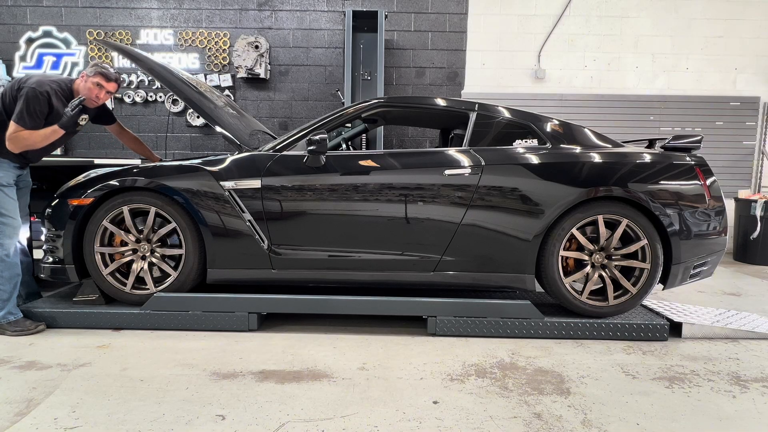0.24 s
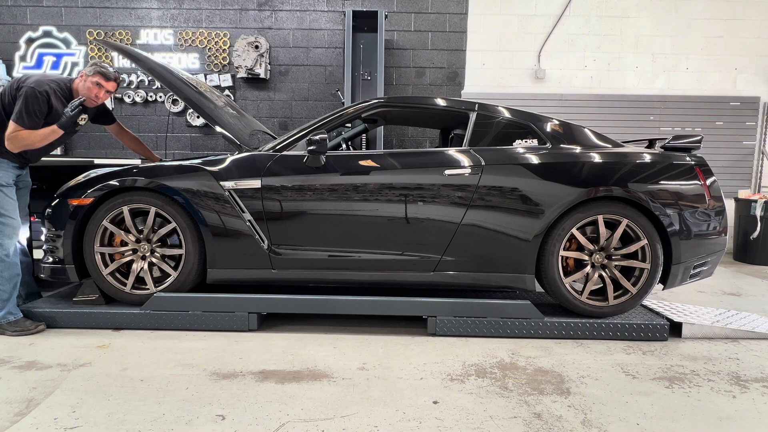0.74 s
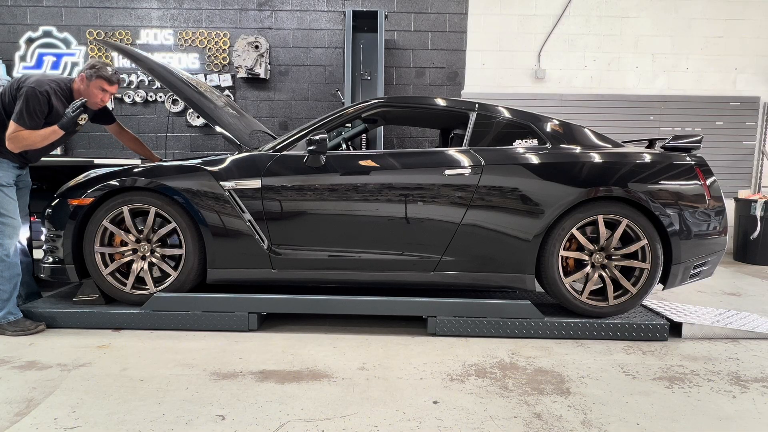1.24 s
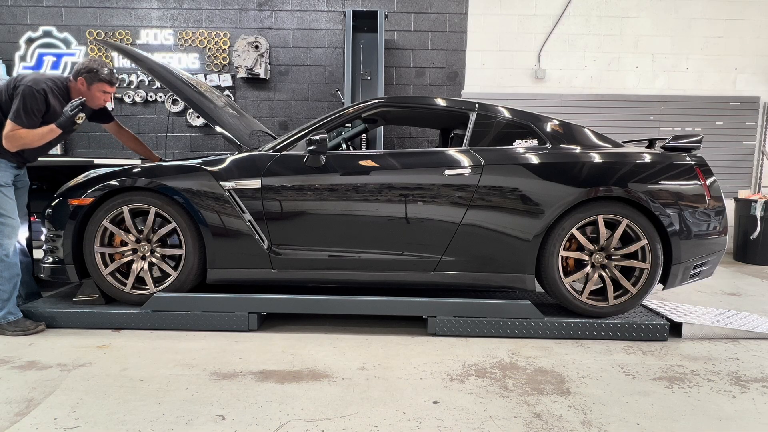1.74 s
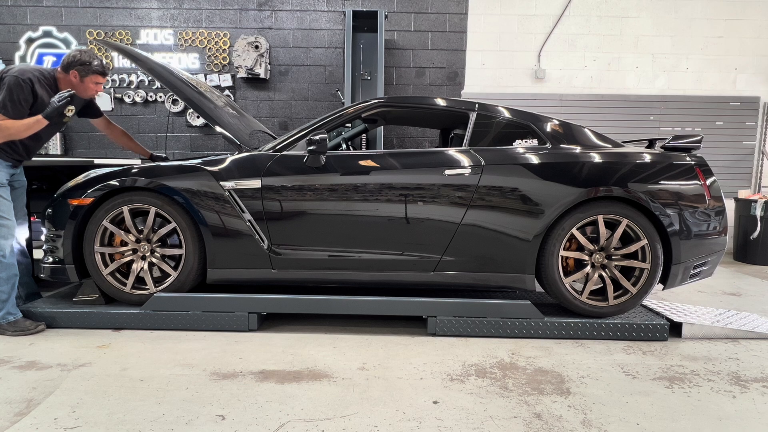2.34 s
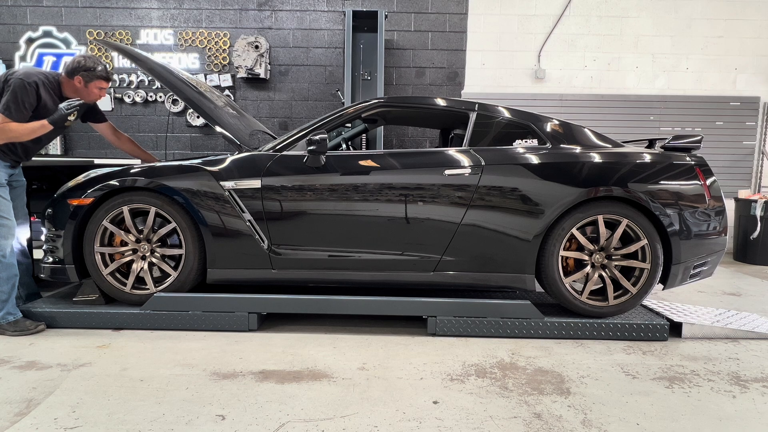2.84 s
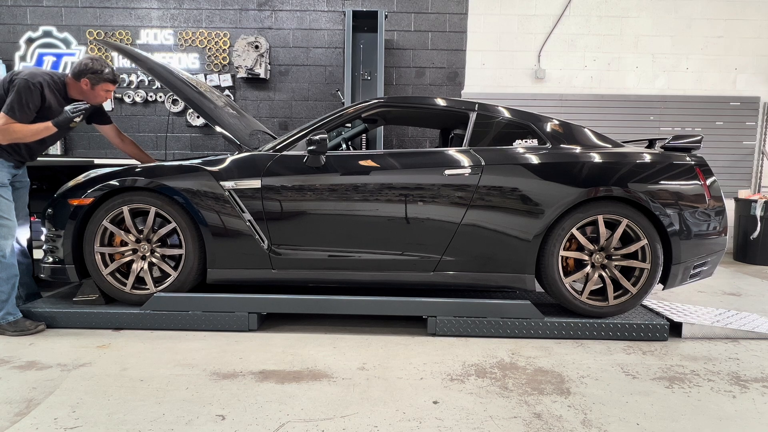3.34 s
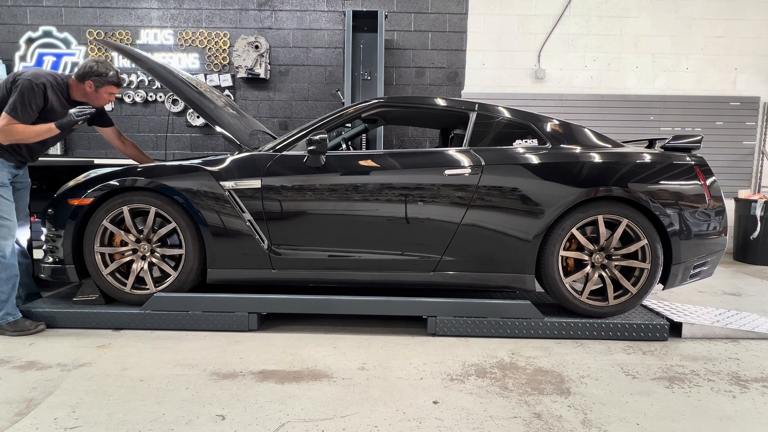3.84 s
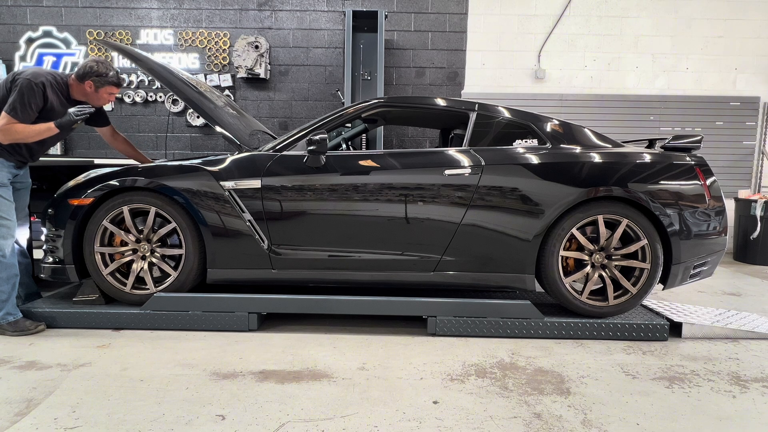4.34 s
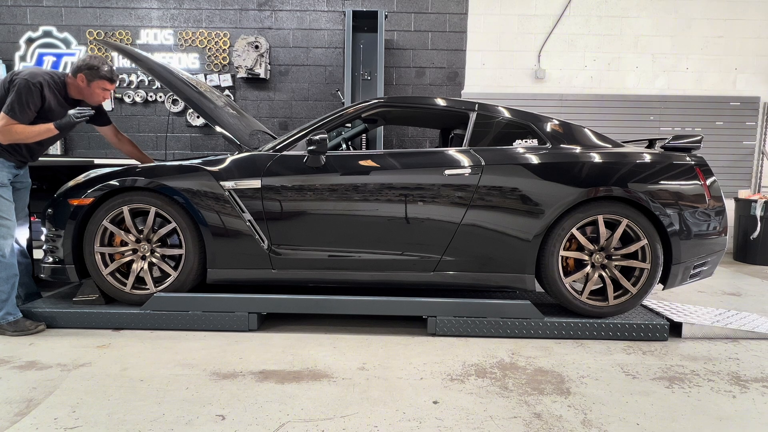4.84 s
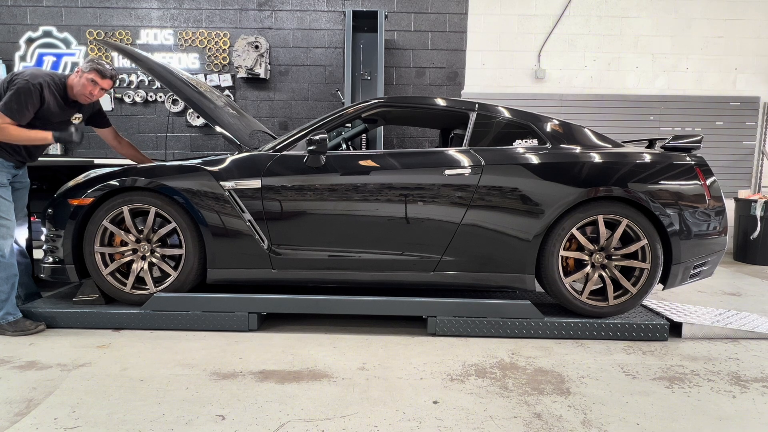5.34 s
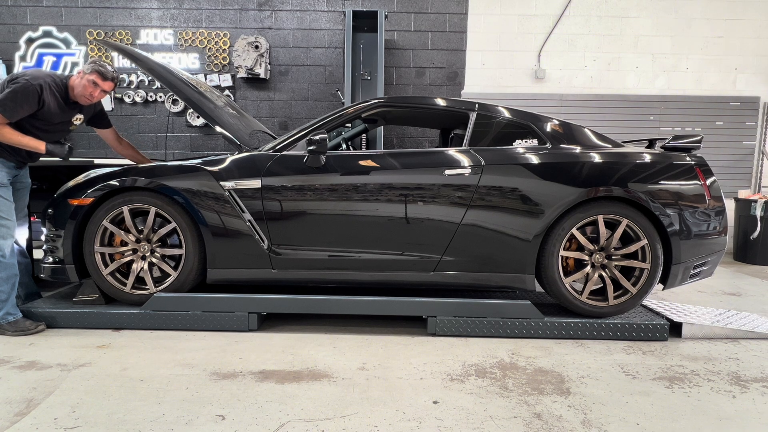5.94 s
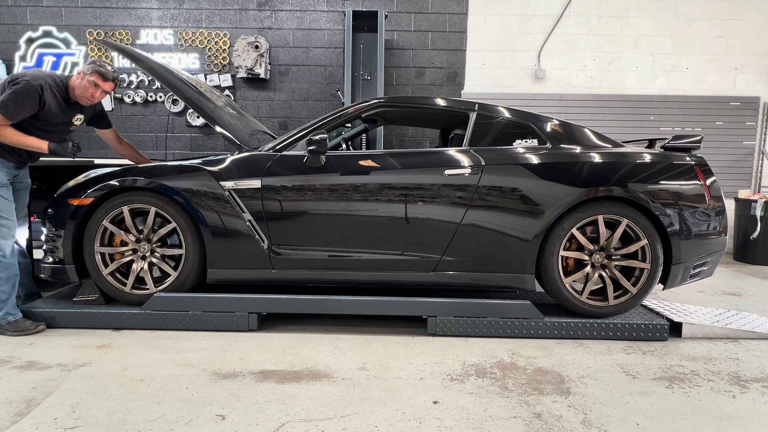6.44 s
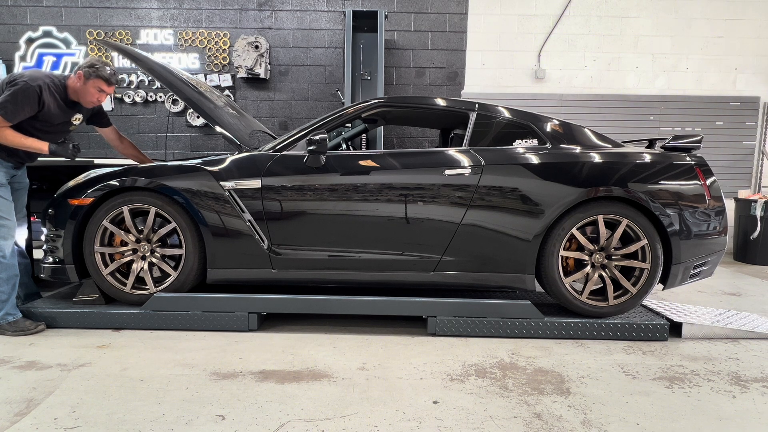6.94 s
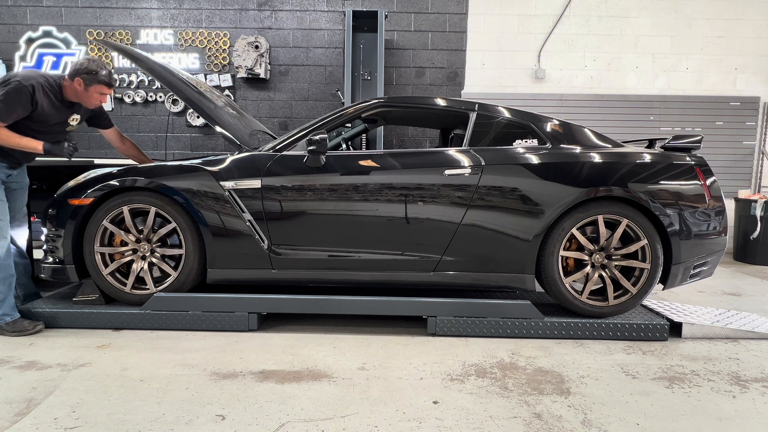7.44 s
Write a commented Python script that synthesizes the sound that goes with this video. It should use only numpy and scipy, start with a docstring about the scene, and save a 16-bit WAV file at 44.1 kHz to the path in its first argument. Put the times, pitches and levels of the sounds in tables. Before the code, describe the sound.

Lumpy car idle with rhythmic chuffing exhaust pops for four seconds, then the engine catches and settles into a steady low hum with faint belt squeaks.

```python
"""In a workshop, a six-cylinder turbo engine idles with its bonnet open to the left.
For about four seconds it misfires: once a cycle the exhaust thumps, chuffs and clatters. Then the cylinder
catches, the speed flares a little and settles to an even burble. Pulses through pipe resonances make the
stumble, sines the burble and whines, shaped noise the engine-bay rush and chuffs, struck resonances the
clatter, clicks the valve ticking and hoarse tones the belt squeak."""
import sys
import numpy as np
from scipy import signal
from scipy.fft import rfft, irfft, next_fast_len
from scipy.io import wavfile
from scipy.ndimage import uniform_filter1d

SR = 44100
rng = np.random.default_rng(int(sys.argv[2]) if len(sys.argv) > 2 else 0)


def transcribe(signal):
    """Save signal, clipped to [-1, 1], as a 16-bit WAV file at the path in sys.argv[1]."""
    frames = np.atleast_2d(signal).T
    limited = np.clip(frames, -1, 1)
    pcm = np.round(limited * 32767).astype(np.int16)
    wavfile.write(sys.argv[1], SR, pcm)


N = 338247
TIME = np.arange(N) / SR
SIZE = next_fast_len(N + SR // 2)   # transform length, with room for echoes to die away
HZ = np.maximum(np.arange(SIZE // 2 + 1) * SR / SIZE, 1)


def from_db(db):
    """Turn decibels into a gain."""
    return 10 ** (np.asarray(db) / 20)


def rms_one(x):
    """Scale to an average strength (rms) of 1."""
    return x / np.sqrt(np.mean(x ** 2) + 1e-20)


def in_time(rows, column=1):
    """Join the points of a table by straight lines over time."""
    rows = np.array(rows)
    return np.interp(TIME, rows[:, 0], rows[:, column])


def over_hz(rows, column=1):
    """Join the points of a table into a spectrum, on a log-frequency axis."""
    rows = np.array(rows)
    return np.interp(np.log(HZ), np.log(rows[:, 0]), rows[:, column])


def filtered(x, response):
    """Apply a frequency response."""
    return irfft(rfft(x, SIZE) * response, SIZE)[..., :N]


def drift(rate_hz):
    """Slow random wandering with rms 1; it weakens above rate_hz."""
    knots = np.arange(0, N + SR, 100)
    spectrum = rfft(rng.standard_normal(len(knots)))
    hz = np.arange(len(spectrum)) * SR / knots[-1]
    slow = irfft(spectrum / (1 + (hz / rate_hz) ** 2), len(knots))
    return rms_one(np.interp(TIME, knots / SR, slow))


def clicks(times, sizes):
    """Single-sample impulses."""
    places = np.clip(np.round(times * SR).astype(int), 0, N - 1)
    return np.bincount(places, sizes, N)


def resonance(hz, width):
    """Response of one resonance, 1 at its peak."""
    return 1j * HZ * width / (hz ** 2 - HZ ** 2 + 1j * HZ * width)


def boosts(rows):
    """Resonant peaks and dips, one after another."""
    return np.prod([1 + (from_db(db) - 1) * resonance(hz, width) for hz, width, db in rows], axis=0)


def butter(edge_hz, kind, order):
    """Response of a high- or low-pass that only looks back in time."""
    return signal.freqs(*signal.butter(order, edge_hz, kind, analog=True), HZ)[1]


# how the sound spreads over the two sides:
# (frequency [Hz], left minus right level [dB], left-right likeness [-1 to 1])
STEREO = [(45, 8, 1), (80, 10, .98), (150, 13, .95), (280, 13, .9), (480, 8.5, -.75), (700, 7.5, -.6),
          (1100, 7.5, .1), (2400, 8, 0), (3500, 13, 0), (5300, 17, 0), (6500, 12, 0), (8000, 0, -.3),
          (12000, 0, .4)]


def diffuse(pair):
    """Mix two unrelated signals into left and right with the likeness of the room."""
    alike = np.clip(over_hz(STEREO, column=2), -1, 1)
    shared = filtered(pair[0], np.sqrt(1 + alike))
    opposed = filtered(pair[1], np.sqrt(1 - alike)) * [[1], [-1]]
    return shared + opposed


def workshop(x, t60, wet_db):
    """Direct sound plus a dense tail off the block walls, falling 60 dB in t60 seconds."""
    tail = rng.standard_normal((2, SR)) * from_db(-60 * TIME[:SR] / t60)
    tail *= from_db(wet_db) / np.sqrt(np.sum(tail ** 2) / 2)
    return x + diffuse(filtered(x, rfft(tail, SIZE)))


# speed of the crankshaft: (time [s], speed [revolutions per minute])
SPEED = [(0.0, 903.4), (0.6, 890.2), (1.1, 888.0), (1.7, 904.4), (2.2, 896.3), (2.7, 893.9), (3.2, 900.3),
         (3.8, 897.5), (4.0, 935.0), (4.2, 983.9), (4.45, 1003.0), (4.75, 978.1), (5.3, 943.9),
         (5.7, 948.7), (6.05, 956), (6.4, 972.5), (6.9, 950.1), (7.67, 944.5)]


def crankshaft_rpm():
    """The crankshaft's speed over time: it flares as the cylinder catches, then settles."""
    return in_time(SPEED)


def passings(cycle, count):
    """Times and numbers of things that happen count times in an engine cycle."""
    number = np.arange(np.ceil(cycle[0] * count), cycle[-1] * count)
    return np.interp(number / count, cycle, TIME), number.astype(int) % count


# engine-bay rush, before the panels colour it: (frequency [Hz], level [dB per Hz])
RUSH = [(15, -35), (28, -20), (45, -17), (72, -13.5), (120, -20.5), (220, -23), (280, -22), (320, -23.5),
        (450, -26.5), (560, -29.5), (800, -30.5), (1150, -30.3), (1600, -32.5), (3000, -37), (4500, -40.5),
        (6100, -42.5), (7700, -49.5), (10500, -59.5), (13000, -61.5)]
# panels and cavities of the bay: (frequency [Hz], width [Hz], boost [dB])
BAY = [(1764, 207, 4.5), (1946, 610, -4.5), (2365, 75, 4.5)]
# change in level of the upper hiss: (time [s], level [dB])
HISS_LEVEL = [(0, -0.5), (2.7, -0.5), (3.5, 0.4), (5.4, -0.4), (6.25, 1.9), (6.9, -.5), (7.67, -.8)]


def engine_bay(cycle, rush_db=0.0, tick_db=-5, uneven_db=5.0, jitter_s=.00011, flutter_db=0.76,
               hiss_hz=3300, hiss_width_hz=2200):
    """Air rush and the ticking of valves and injectors, coloured by the same panels."""
    times, valve = passings(cycle, count=24)
    chance = rng.standard_normal((len(times), 2))
    # each valve keeps its own loudness, and each tick varies a little around it
    own_loudness = rng.standard_normal(valve.max() + 1)[valve]
    sizes = from_db(uneven_db * (own_loudness + chance[:, 0] / 2))
    tick_clicks = clicks(times + jitter_s * chance[:, 1], sizes)
    ticks = rms_one(workshop(tick_clicks, t60=0.31, wet_db=10))
    air = diffuse(rng.standard_normal((2, N))) * from_db(rush_db + flutter_db * drift(7.4))
    bay = filtered(air + from_db(tick_db) * ticks, from_db(over_hz(RUSH)) * boosts(BAY))
    hiss = filtered(bay, resonance(hiss_hz, hiss_width_hz))
    return bay + (from_db(in_time(HISS_LEVEL)) - 1) * hiss


# belt-driven accessories, levels they wander around: (turns per engine cycle, level [dB])
WHINES = [(58, -55), (118.3, -60), (137.8, -57), (154, -58)]
# the loudest pulley swells and fades, before its gain of 1.5: (time [s], level [dB])
PULLEY = [(0, -63), (.9, -52), (1.6, -60), (2.4, -55), (3.9, -60), (4.2, -62), (4.5, -54), (4.9, -65),
          (5.3, -52.5), (5.6, -63), (5.9, -53.5), (6.25, -54), (6.55, -64), (6.9, -55), (7.15, -62),
          (7.5, -50), (7.67, -58)]


def accessories(cycle, pulley_turns=76.3):
    """Pulleys and pumps whine faintly in step with the crank, fading in and out."""
    pulley_phase = 2 * np.pi * pulley_turns * cycle + .4 * drift(6)
    out = 1.5 * from_db(in_time(PULLEY)) * np.sin(pulley_phase)
    for turns, db in WHINES:
        fading = from_db(db + 4.5 * drift(4))
        out = out + fading * np.sin(2 * np.pi * turns * cycle + .6 * drift(10))
    return out


def squeak(hz, width_hz, waver_hz=30):
    """A thin, wavering tone, made hoarse by slow noise that swings its strength."""
    hoarse = rms_one(filtered(rng.standard_normal((2, N)), butter(width_hz, "low", order=2)))
    return hoarse * np.sin(2 * np.pi * np.cumsum(hz + waver_hz * drift(12)) / SR)


# faint squeak between the chirps, before it flickers: (time [s], level [dB])
BELT_SLIP = [(0, -54), (1.6, -55), (2.7, -66), (3.4, -53), (4.4, -51), (5.6, -54.5), (7.67, -51)]
# the belt chirps out, before chirp_db is added: (start time [s], length [s], level [dB], pitch [Hz])
CHIRPS = [(0.204, 0.092, -46, 6330), (0.806, 0.085, -46.5, 6380), (1.087, 0.046, -51, 6400),
          (1.229, 0.03, -48, 6190), (1.446, 0.1, -51, 6430), (1.828, 0.035, -50, 6360),
          (2.038, 0.044, -49, 6340), (2.362, 0.077, -52, 6350), (2.956, 0.059, -54, 6540),
          (3.18, 0.07, -52, 6290), (3.57, 0.052, -56, 6340), (3.953, 0.13, -55, 6400),
          (4.1, 0.25, -50, 6380), (4.385, 0.29, -48.5, 6530), (4.696, 0.078, -49, 6560),
          (5.055, 0.047, -48, 6260), (5.246, 0.039, -49, 6300), (5.327, 0.037, -54, 6500),
          (5.559, 0.04, -50, 6500), (5.842, 0.09, -50, 6410), (6.14, 0.046, -52, 6400),
          (7.012, 0.036, -61, 6400), (7.272, 0.036, -49, 6700), (7.52, 0.05, -55, 6560)]


def belt(belt_hz=6370, chirp_db=4.0, flicker_db=2.0, flicker_hz=9, fade_s=0.02):
    """The belt squeaks faintly in fits, and now and then chirps out as it slips."""
    flicker = rms_one(from_db(flicker_db * drift(flicker_hz)))
    faint = from_db(in_time(BELT_SLIP)) * flicker * squeak(belt_hz, width_hz=53)
    envelope, pitch_points = 0, []
    for start, length, db, hz in CHIRPS:
        # full strength for the first half, then a longer fade
        corners = [start - fade_s, start, start + length / 2, start + length + fade_s]
        envelope = envelope + from_db(db + chirp_db) * np.interp(TIME, corners, [0, 1, 1, 0])
        pitch_points += [(start, hz), (start + length, hz)]
    return faint + envelope * squeak(in_time(pitch_points), width_hz=71)


def misfires(cycle, fault, pop_phase=.166):
    """One pop every engine cycle, at pop_phase of the cycle, for as long as the cylinder fails to fire."""
    times, _ = passings(cycle - pop_phase, count=1)
    return times[np.interp(times, TIME, fault) > .5]


def detuned(x, lag_s=0.00042, rate_hz=5):
    """The ring shifts a little in pitch from pop to pop as the metal shakes."""
    when = TIME + lag_s * filtered(drift(rate_hz), butter(2 * rate_hz, "low", order=2))
    return np.array([np.interp(when, TIME, channel) for channel in x])


# knocks that go with each pop, levels relative to each other:
# (time from the pop [s], level [dB], frequency the knock drives most [Hz])
KNOCKS = [(-.069, 2.5, 420), (-.048, -4.5, 430), (-.0355, 2.5, 850), (-.024, -5, 450), (-.019, -0.5, 690),
          (-.0095, -0.5, 1180), (.001, 0.5, 710), (.031, -3, 720)]
# metal that they ring, levels relative to each other: (frequency [Hz], width [Hz], level [dB])
CLATTER = [(425, 26, -7), (467, 20, -23), (565, 27, -4), (660, 33, 1.5), (781, 31, 2), (1130, 95, 1),
           (1240, 43, -4), (1747, 79, 3)]


def clatter(times, level_db=-41, scatter_s=0.00021, uneven_db=2, rattle_s=0.0048, rattle_db=-4, octaves=1.0):
    """Each jolt sets off the same run of knocks in the exhaust's metal, each with a short loose rattle."""
    loose = rng.standard_normal((2, N)) * from_db(rattle_db) * np.sqrt(2 / (rattle_s * SR))
    dying = rfft(np.exp(-TIME / rattle_s), SIZE)
    drive = 0
    for offset, db, hz in KNOCKS:
        chance = rng.standard_normal((len(times), 2))
        hit_times = times + offset + scatter_s * chance[:, 0]
        hits = clicks(hit_times, from_db(db + uneven_db * chance[:, 1]))
        # the bare hits go into the second signal only, the rattle into both
        struck = hits * [[0], [1]] + loose * filtered(hits, dying)
        drive = drive + filtered(struck, resonance(hz, hz * octaves))
    metal = sum(from_db(db) * resonance(hz, width) for hz, width, db in CLATTER)
    metal = metal * butter(1440, "low", order=2)
    ringing = workshop(diffuse(filtered(drive, metal)), t60=0.27, wet_db=-2.5)
    return from_db(level_db) * rms_one(detuned(ringing))


# the stumble, one row per cylinder in firing order, before the overall level and filters:
# (low push level [dB], its lateness [ms], sharp edge level [dB], its lateness [ms])
CYLINDERS = [(-0.32, -0.01, -12.42, -3.62), (-6.55, 1.83, -18.6, 0.4), (-6.71, 1.35, -12.51, -8.2),
             (-9.57, 1.72, -11.32, -3.95), (-4.5, -0.1, -7.34, 2.36), (-6.42, -0.02, -18.45, 1.0)]
# resonances and dips of exhaust and workshop: (frequency [Hz], width [Hz], boost [dB])
PIPE = [(51.9, 2.5, 23.8), (74.7, 5.3, 24.2), (82.2, 2.4, -46), (95.6, 5.6, -30.1), (122.5, 5.4, 16.9),
        (149.5, 7.2, -13.3), (157.9, 11, 19), (197, 14, 9), (224, 7.2, 15.6), (249.3, 9.2, 11.6),
        (266.7, 5.4, 25.1), (282, 5.4, 19.8), (325.3, 28.3, 9), (408, 30, 13), (463, 9, 21)]
# the muffler passes little below its lowest resonance: (frequency [Hz], level [dB])
MUFFLER_BASS = [(22, -28), (34, -12), (43, 3)]


def exhaust(cycle, fault, level_db=22, low_hz=23, high_hz=68, muffler_hz=420, edge_hz=115,
            jitter_s=.00005, roughness=.04, imbalance=.06):
    """Stumbling exhaust: each firing is a low push with a sharp edge, and the misfire unsettles all six."""
    times, cylinder = passings(cycle, count=6)
    push_db, push_ms, edge_db, edge_ms = np.array(CYLINDERS)[cylinder].T
    chance = rng.standard_normal((len(times), 2))
    # a small share of the stumble stays in even running
    stumble = np.interp(times, TIME, np.maximum(fault, imbalance))
    sizes = from_db(level_db) * (1 + roughness * chance[:, 0]) * stumble
    times = times + jitter_s * chance[:, 1]
    push = clicks(times + push_ms / 1000, sizes * from_db(push_db))
    edge = clicks(times + edge_ms / 1000, sizes * from_db(edge_db))
    low = 1 / (1 + (HZ / edge_hz) ** 8)   # pushes sound below edge_hz, edges above
    muffler = butter(low_hz, "high", order=4) * butter(high_hz, "low", order=2)
    muffler = muffler * butter(muffler_hz, "low", order=3)
    pipe = boosts(PIPE) * muffler * from_db(over_hz(MUFFLER_BASS))
    return -filtered(push, pipe * low) - filtered(edge, pipe * (1 - low))


# colour of the gas chuff, before each chuff's own size: (frequency [Hz], level [dB per Hz])
CHUFF = [(200, -48), (400, -36), (700, -12.5), (1150, -33.5), (2000, -30), (3300, -28.5), (6000, -41.5),
         (9000, -49), (13000, -64)]


def chuffs(times, level_db=7.5, lead_s=0.047, rise_s=0.024, fall_s=0.021):
    """Gas rushes out just ahead of each thump: noise that swells and dies."""
    sizes = from_db(level_db + .5 * rng.standard_normal(len(times)))
    shape = (1 - np.exp(-TIME / rise_s)) * np.exp(-TIME / fall_s)
    envelope = filtered(clicks(times - lead_s, sizes), rfft(shape, SIZE))
    gas = filtered(rng.standard_normal((2, N)), from_db(over_hz(CHUFF)))
    return envelope * diffuse(gas)


def thumps(times, level_db=-17.3, swing_hz=63.4, spread_s=.017):
    """The gap in the gas flow makes the exhaust column swell and swing for a few cycles."""
    halfway = (times[1:] + times[:-1]) / 2
    from_pop = TIME - times[np.searchsorted(halfway, TIME)]   # time from the nearest pop
    swell = from_db(level_db) * np.exp(-(from_pop / spread_s) ** 2)
    return swell * np.cos(2 * np.pi * swing_hz * from_pop)


# harmonics of even running, which slide through the workshop's standing waves as the speed changes,
# before the overtones build up and level_db is added:
# (multiple of the engine cycle, then peak level [dB] at each speed of HARMONIC_RPM)
HARMONICS = [(6, -19.9, -18.7, -17.2, -14.2), (7, -44.5, -45.9, -36.5, -41.2),
             (9, -24.1, -24.4, -23.7, -28.0), (10, -40.0, -42.5, -47.4, -58.7),
             (12, -31.1, -45.1, -36.4, -26.9), (15, -45.7, -46.9, -52.6, -42.7),
             (18, -29.9, -33.5, -31.6, -25.9), (21, -40.8, -41.7, -46.2, -52.5),
             (24, -33.8, -41.4, -52.5, -36.3), (27, -47.1, -49.0, -52.6, -38.4),
             (30, -32.9, -41.5, -31.8, -32.3), (31, -47.5, -47.3, -50.4, -37.1),
             (33, -29.4, -29.9, -43.3, -28.2), (34, -52.6, -53.9, -39.3, -43.7),
             (36, -29.1, -32.8, -42, -43), (39, -57.1, -52.9, -60.6, -47.9),
             (42, -52.0, -53.9, -59.4, -64.1), (48, -57.5, -60.4, -68.1, -48.9),
             (51, -55.1, -58.3, -58.4, -57.7), (57, -54.3, -60.7, -54.1, -63.4)]
# the speeds of those levels: (speed [revolutions per minute])
HARMONIC_RPM = [945, 960, 975, 1000]
# overtones build up after the cylinder catches; half of this is applied away from the standing wave,
# and the opposite half at its centre: (time [s], level [dB])
CATCH = [(3.9, -7), (4.12, -6), (4.3, 0)]


def burble(cycle, level_db=0.2, smear_hz=370, standing_hz=268, width_hz=16, lag_rad=1.87, build_s=0.1,
           pulse_lag=.061):
    """Even running: harmonics line up into pulses; a standing wave delays one, the room smears the highest."""
    rpm, catch_db, out = crankshaft_rpm(), in_time(CATCH), 0
    for (multiple, *db), chance in zip(HARMONICS, rng.standard_normal(len(HARMONICS))):
        hz = multiple * rpm / 120   # one engine cycle is two turns
        smear = chance * (hz.mean() / smear_hz) ** 4
        standing = np.exp(-((hz - standing_hz) / width_hz) ** 2)
        gain = np.interp(rpm, HARMONIC_RPM, from_db(db))
        gain = uniform_filter1d(gain, int(build_s * SR))
        is_overtone = multiple > HARMONICS[0][0]
        gain = gain * from_db(catch_db * is_overtone * (0.5 - standing))
        # pulse_lag: from firing to tailpipe, as a share of a cycle
        phase = 2 * np.pi * multiple * (cycle - pulse_lag) + smear - lag_rad * standing
        out = out - gain * np.sin(phase)
    return from_db(level_db) * out


# how far the cylinder misfires: (time [s], share of misfiring [0-1])
FAULT = [(3.84, 1), (3.99, 0)]


def scene(start_cycle=-.378):
    """All sources together, most of the sound stronger on the left."""
    cycle = start_cycle + np.cumsum(crankshaft_rpm()) / (120 * SR)   # engine cycles since firing 0
    fault = in_time(FAULT)
    pops = misfires(cycle, fault)
    right = from_db(-over_hz(STEREO))
    boom = exhaust(cycle, fault) + thumps(pops) + (1 - fault) * burble(cycle)
    boom = filtered(boom, 2 / (1 + right))   # keeps the mean of left and right at the level set
    both = boom + chuffs(pops) + clatter(pops) + engine_bay(cycle) + accessories(cycle) + belt()
    return np.array([both[0], filtered(both[1], right)])


def record(dry, cutoff_hz=15800):
    """The top is cut steeply."""
    return signal.sosfilt(signal.ellip(10, .1, 90, cutoff_hz, fs=SR, output="sos"), dry)


dry = scene()
out = record(dry)
transcribe(out)
```